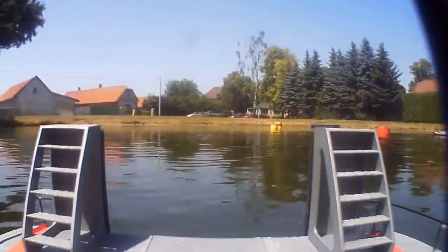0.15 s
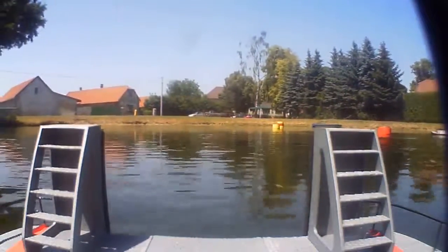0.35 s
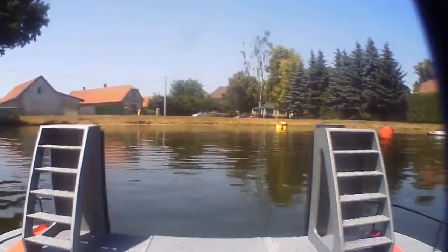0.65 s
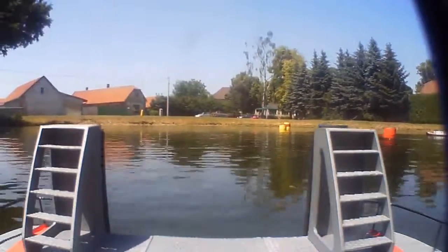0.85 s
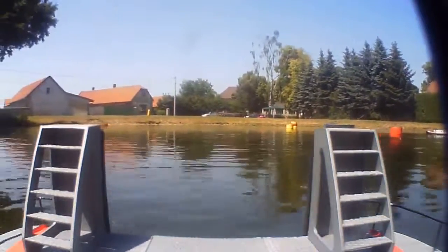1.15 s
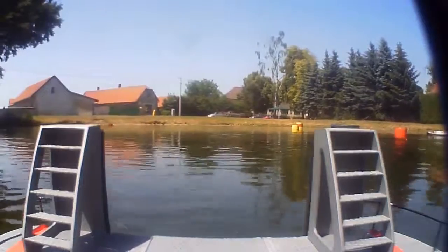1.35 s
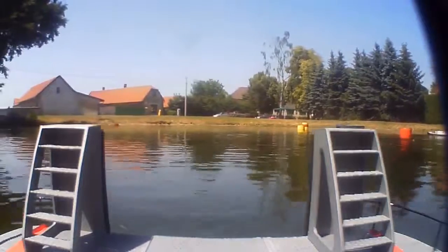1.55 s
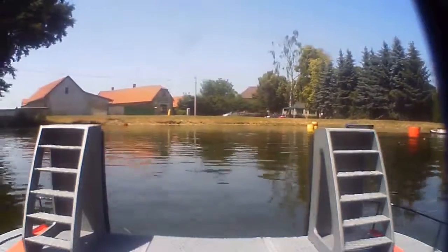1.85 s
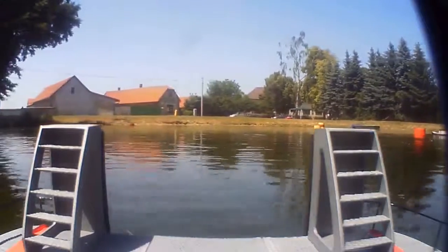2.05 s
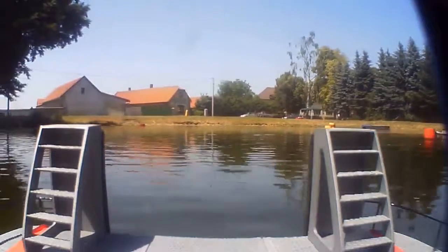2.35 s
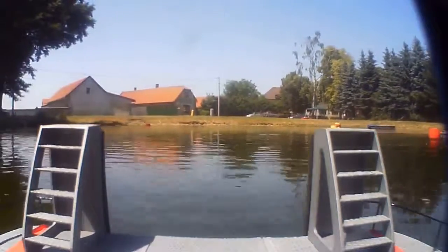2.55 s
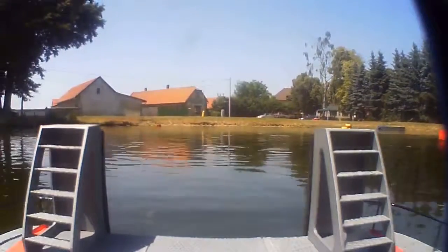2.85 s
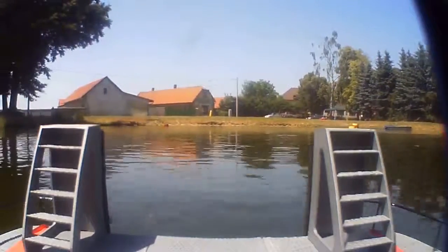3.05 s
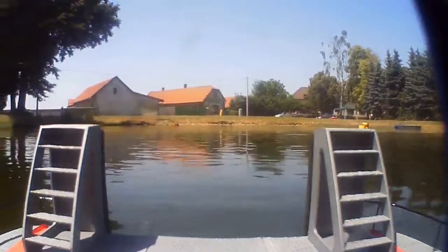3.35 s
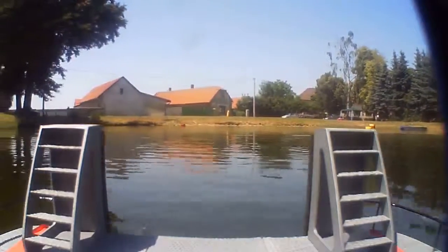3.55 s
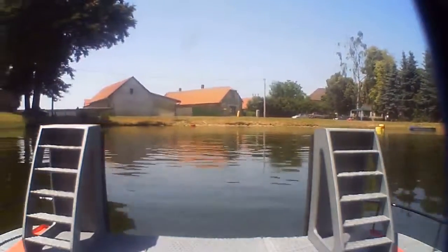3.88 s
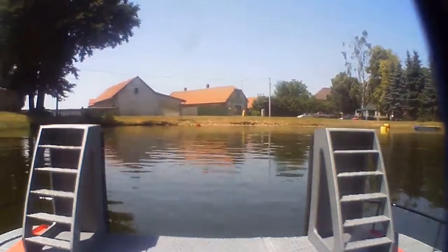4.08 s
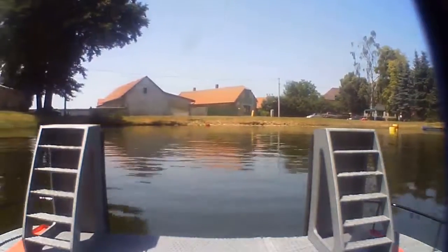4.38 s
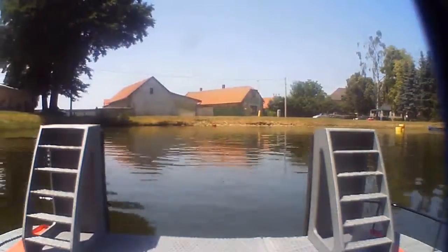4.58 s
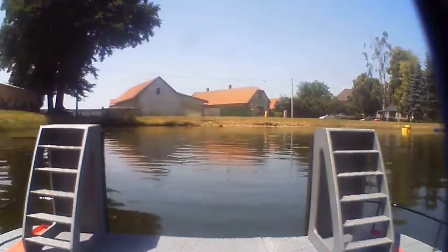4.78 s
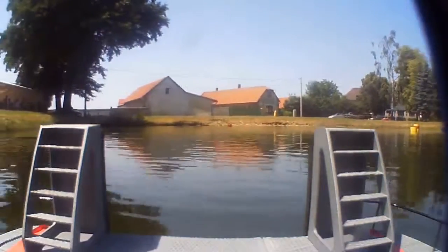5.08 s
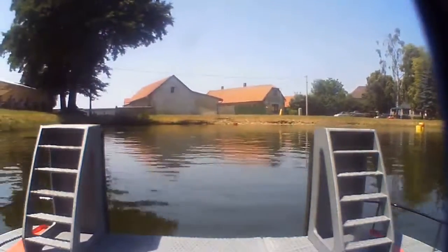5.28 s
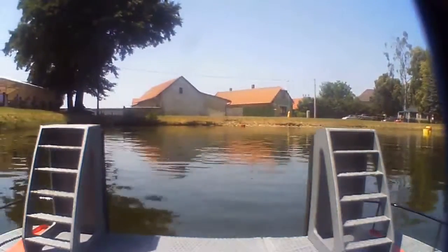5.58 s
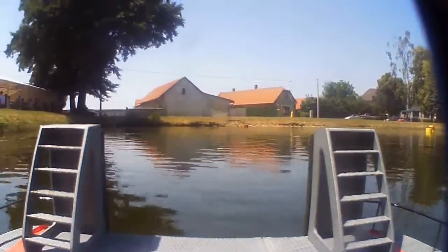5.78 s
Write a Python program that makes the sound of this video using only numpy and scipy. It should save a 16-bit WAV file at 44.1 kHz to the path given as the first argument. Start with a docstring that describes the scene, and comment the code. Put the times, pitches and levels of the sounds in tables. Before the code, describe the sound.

Close, gritty buzz of a little electric boat motor with knocking shaft, climbing gradually in pitch before a quick reversal and duller rev-up.

```python
"""A model boat's small geared electric motor, heard through the hull by a microphone on deck.
It first slows astern, is thrown ahead under load at 0.4 s and gains speed to 4.8 s: random tooth taps rattle
hull and case, the rotor hums, the mesh whines, brushes tick, the shaft knocks in its play, a controller whistles.
Near 5.15 s it reverses and speeds up astern: gear case and shell grow duller, a wavering tone replaces the
whistle, the shaft thumps and, from 5.37 s, ticks once a turn. Faint hiss lies under everything."""
import sys
import numpy as np
from scipy import signal
from scipy.fft import rfft, irfft
from scipy.io import wavfile
from scipy.ndimage import uniform_filter1d

SR = 44100
rng = np.random.default_rng(int(sys.argv[2]) if len(sys.argv) > 2 else 0)


def dump(signal):
    """Clip the signal to [-1, 1] and save it as 16-bit WAV at the path in sys.argv[1]."""
    limited = np.clip(np.atleast_2d(signal).T, -1, 1)
    pcm = np.round(limited * 32767).astype(np.int16)
    wavfile.write(sys.argv[1], SR, pcm)


N = 261015
PINION_TEETH, WHEEL_TEETH = 16, 50


def undb(db):
    """Amplitude factor of a level in dB."""
    return 10 ** (np.asarray(db) / 20)


def unit(x):
    """Scale to an RMS of 1."""
    return x / np.sqrt(np.mean(x ** 2))


def walk(rate_hz):
    """Random levels held 1 / rate_hz and smoothed twice; RMS 1."""
    hold = max(int(SR / rate_hz), 2)
    steps = np.repeat(rng.standard_normal(N // hold + 1), hold)[:N]
    return unit(uniform_filter1d(uniform_filter1d(steps, hold), hold))


def ring(x, modes):
    """Minimum-phase, unit-energy response of a body whose steep resonances add in power."""
    size = 2 ** 14
    f = np.fft.rfftfreq(size, 1 / SR)
    power = sum(undb(2 * db) / (1 + (2 * (f - hz) / width_hz) ** 2) ** 2 for hz, width_hz, db in modes)
    # fold the cepstrum to make the response causal
    cepstrum = irfft(np.log(power) / 2)
    cepstrum[1:size // 2] *= 2
    cepstrum[size // 2 + 1:] = 0
    response = irfft(np.exp(rfft(cepstrum)))[:size // 2]
    return signal.fftconvolve(x, unit(response) / np.sqrt(size // 2))[:N]


def shaft_turns(turns):
    """Turns of the propeller shaft, geared down from the motor."""
    return turns * PINION_TEETH / WHEEL_TEETH


def taps(turns):
    """One unit tap at every whole turn, either way round."""
    return np.abs(np.diff(np.floor(turns), prepend=np.floor(turns[0])))


def once_a_turn(turns, depth_db):
    """Eccentric wheels press the teeth harder once a turn."""
    return undb(depth_db * np.cos(2 * np.pi * turns))


def curves(table, t):
    """Columns of a table joined by straight lines in time."""
    s, *columns = np.transpose(table)
    return [np.interp(t, s, column) for column in columns]


def tone(table, hz, waver_rad, t):
    """Thin sine with wavering phase, sounding only over the span of its table."""
    s, db = np.transpose(table)
    level = undb(np.interp(t, s, db, left=-200, right=-200))
    return level * np.sin(2 * np.pi * hz * t + waver_rad * walk(37))


# Speed controller whistle. Each row: time in seconds, peak level in dB.
WHISTLE = [(.37, -59.5), (1.0, -59), (5.0, -60.5)]
# Wavering tone astern. Each row: time in seconds, peak level in dB.
DRONE = [(5.13, -62.5), (5.5, -59.5), (5.92, -61.5)]
WHISTLE_HZ, DRONE_HZ = 2093, 1360


def controller(t):
    """The controller whistles as it chops the current; another tone sounds astern."""
    return tone(WHISTLE, WHISTLE_HZ, 0.47, t) + tone(DRONE, DRONE_HZ, 0.31, t)


# Resonances rung by a dry tick. Each row: frequency in Hz, width in Hz, relative level in dB.
TICK = [(2457, 250, 16.5), (3100, 790, 4), (6140, 1170, -5.5), (8700, 710, 0.5), (9470, 300, 2.5),
        (10300, 610, -1.5)]
BRUSH_AHEAD_DB, BRUSH_ASTERN_DB = -51, -50  # before load, fading and ring gain
BRUSH_LOAD_SHARE = .4  # dB of tick per dB of case rattle
BRUSH_FADE_FROM_HZ, BRUSH_FADE_DB_PER_HZ = 118, -.4  # Hz of motor turns


def brushes(turns, speed_hz, case_db):
    """Brushes tick once per motor turn, following the case load and fading at high speed."""
    tick_db = np.where(speed_hz > 0, BRUSH_AHEAD_DB, BRUSH_ASTERN_DB)
    tick_db = tick_db + BRUSH_LOAD_SHARE * (case_db - case_db.max())
    tick_db = tick_db + BRUSH_FADE_DB_PER_HZ * np.maximum(np.abs(speed_hz) - BRUSH_FADE_FROM_HZ, 0)
    size = undb(tick_db + 2.0 * rng.standard_normal(N))
    return ring(undb(15.5) * taps(turns + 0.33) * size, TICK)


ASTERN_KNOCK_FROM_S, ASTERN_KNOCK_DB, ASTERN_SLIP_S = 5.37, -34, .0015


def astern_knocks(turns):
    """Driven fast astern, the shaft knocks dryly once in each of its turns, a little uneven."""
    s = np.flatnonzero(taps(shaft_turns(turns) + 0.38)) / SR
    s = s[s > ASTERN_KNOCK_FROM_S]
    slip, size = rng.standard_normal((64, 2))[:len(s)].T
    at = np.minimum((s + ASTERN_SLIP_S * slip) * SR, N - 1).astype(int)
    ticks = np.zeros(N)
    ticks[at] = undb(1.5 * size)
    return ring(undb(ASTERN_KNOCK_DB) * ticks, TICK)


def propeller(turns, hull_db):
    """The shaft thumps at its own slower turn when it runs fast astern."""
    fast = np.clip((-np.gradient(turns) * SR - 80) / 70, 0, 1)
    angle = 2 * np.pi * shaft_turns(turns)
    thump = undb(-9.5) * np.sin(angle) + undb(-18.0) * np.sin(2 * angle)
    return fast * undb(hull_db + 3.3 * walk(15)) * thump


# Hull resonances. Each row: frequency in Hz, width in Hz, relative level in dB.
HULL = [(49.7, 47, -29), (147.6, 57.6, -4), (190.1, 12.1, 7), (231.4, 53.3, -2.5), (309.6, 42, -8.5),
        (407.2, 58, -5), (456.7, 59, -7), (502.8, 54, -4), (544.2, 53, -3.5), (604.7, 165, -6),
        (732, 69, -14), (916, 196, -21), (1081, 92, -20.5), (1278, 130, -28.5)]
# Rotor overtones ahead. Each row: multiple of the motor turn, relative level in dB.
AHEAD = [(2, -3), (3, -4.5), (4, -11), (5, -18), (6, -7)]
# Rotor overtones astern. Each row: multiple of the motor turn, relative level in dB.
ASTERN = [(2, -6), (3, -9.5), (4, -9), (5, -10.5), (6, -9)]
HUM_DB, HUM_DB_PER_OCTAVE = -44, 8.5  # at 100 turns a second, before the mount swell
MOUNT_HZ, MOUNT_WIDTH_HZ, MOUNT_DB = 123.3, 30, 10.5
OVERTONES_AHEAD_DB, OVERTONES_ASTERN_DB = -45.5, -46  # offsets at 100 turns a second
OVERTONES_DB_PER_OCTAVE = 2.5


def overtones(table, turns, flutter_db, waver_rad):
    """Sum of fluttering multiples of the motor turn."""
    total = 0
    for multiple, db in table:
        level = undb(db + walk(5.19) + flutter_db * walk(30))
        total = total + level * np.sin(multiple * 2 * np.pi * turns + waver_rad * walk(25))
    return total


def rotor(turns, speed_hz):
    """Unbalance hums, swelling at the mount resonance; hull-coloured overtones flutter most under load ahead."""
    hz = np.abs(speed_hz)
    octaves = np.log2(np.maximum(hz, 10) / 100)
    mount_db = MOUNT_DB / (1 + (2 * (hz - MOUNT_HZ) / MOUNT_WIDTH_HZ) ** 2)
    hum_db = HUM_DB + HUM_DB_PER_OCTAVE * octaves + mount_db
    hum = np.sqrt(2) * np.sin(2 * np.pi * turns) * undb(hum_db + 0.7 * walk(47))
    over_db = np.where(speed_hz > 0, OVERTONES_AHEAD_DB, OVERTONES_ASTERN_DB)
    over_db = over_db + OVERTONES_DB_PER_OCTAVE * octaves
    ahead = overtones(AHEAD, turns, 4.0, .53)
    astern = overtones(ASTERN, turns, 1.5, .25)
    over = np.where(np.gradient(turns) < 0, astern, ahead)
    broad_modes = [mode for mode in HULL if mode[1] > 25]
    return hum + ring(over * undb(over_db), broad_modes)


LIGHT_KNOCK_DB, LIGHT_SCATTER_DB, LIGHT_DULL_DB = -7.5, 3.5, 1.5  # first one relative to case_db


def light_knocks(turns, speed_hz, case_db):
    """Rows for knocks(): ahead, each shaft turn gives a light one of random size."""
    i = np.flatnonzero(taps(shaft_turns(turns)) * (speed_hz > 0))
    size = (2 * rng.random((256, 2)) - 1)[:len(i)].T
    db = case_db[i] + LIGHT_KNOCK_DB + LIGHT_SCATTER_DB * size[0]
    dull_db = LIGHT_DULL_DB + LIGHT_SCATTER_DB * size[1]
    return list(zip(i / SR, db, dull_db))


# Gear case resonances. Each row: frequency in Hz, width in Hz, relative level in dB.
CASE = [(1380, 57, -11.5), (1586, 750, -0.5), (2212, 270, 4.5), (2451, 626, 1.5), (3144, 160, -5.5),
        (3710, 230, -17.5)]
# Motor shell resonances. Each row: frequency in Hz, width in Hz, relative level in dB.
SHELL = [(5530, 500, -12), (7040, 1300, -7.5), (8680, 1000, 0.5), (9480, 1340, -1), (11500, 1700, -10),
         (14000, 1200, -10)]
# Thin gear case rings, lit by knocks and mesh whine. Each row: frequency in Hz, width in Hz, relative level in dB.
RINGS = [(944, 45, 20), (1180, 29, 9), (1283, 73, 6.5), (1665, 700, -3), (2270, 110, 15), (2440, 110, 12),
         (2470, 37, -12), (2560, 250, 9.5), (3100, 56, -11), (3583, 110, -6), (4900, 84, -17),
         (5170, 90, -13), (5390, 110, -13), (6720, 360, -15.5), (8660, 150, -1), (9790, 68, 7)]
# Loudest shaft knocks. Each row: start in seconds, relative level in dB, extra level of the dull blow in dB.
KNOCKS = [(0.0702, -55, 8.5), (0.262, -55.5, -4), (0.2887, -60, 1), (0.3553, -55.5, 8), (0.4114, -74, 9),
          (0.4639, -55.5, 8), (0.7774, -51.5, 11), (0.8065, -49, 3), (0.842, -51.5, 15), (0.8716, -47, 8),
          (0.907, -52, 11), (1.035, -54, 8), (1.2803, -57, 16), (1.3054, -59, -3), (1.3697, -45.5, 8.5),
          (1.4017, -50, 10.5), (1.4334, -52, 10), (1.691, -55, 14.5), (2.3556, -47, 12), (2.385, -49, 9),
          (2.494, -52, 1), (2.81, -47, 9), (2.839, -50, 9), (2.8682, -45, 6.5), (2.8956, -48, 5),
          (3.2472, -57, 5), (3.2755, -47, 6), (3.6995, -53, -3), (3.8116, -50, -8), (4.1818, -52, -5)]


def knocks(rows):
    """The shaft strikes in its play: tick, dull blow and brighter scrape ring hull, case and shell."""
    t = np.arange(int(.015 * SR)) / SR
    dull, bright, tick = np.zeros((3, N + len(t)))
    signs = np.sign(rng.standard_normal((len(rows), 1024)))
    for (s, db, dull_db), noise in zip(rows, signs):
        i = int(s * SR)
        burst = noise[:len(t)]
        dull[i:i + len(t)] += undb(db + dull_db) * burst * np.exp(-t / 0.0044)
        bright[i:i + len(t)] += undb(db) * burst * np.exp(-t / 0.0037)
        tick[i] = undb(db)
    scrape = ring(undb(-4) * bright, SHELL)
    dry_tick = ring(undb(19) * tick, TICK)
    case = ring(undb(3) * dull, RINGS[2:4]) + ring(undb(-1.5) * dull, CASE)
    return scrape + dry_tick + case + ring(undb(10.5) * dull, HULL)


# Mesh whine. Each row: multiple of the tooth rate, relative level in dB, rate of the random level in Hz.
MESH = [(1, 5.5, 160), (2, 2.5, 150), (3, 6, 450), (4, 3, 220), (5, 2, 2000), (6, -5.5, 420)]


def mesh(turns, speed_hz, case_db):
    """Blurred whine on multiples of the tooth rate ahead, strongest as the motor pulls up."""
    ahead = speed_hz > 0
    pull = np.clip(uniform_filter1d(np.gradient(speed_hz) * SR, SR // 20) / 150, 0, 1)
    angle = 2 * np.pi * PINION_TEETH * turns
    whine = sum(undb(db) * walk(blur_hz) * np.sin(k * angle) for k, db, blur_hz in MESH)
    whine = whine * ahead * undb(case_db - 13.5 + 4.4 * pull)
    hull_whine = pull * ahead * undb(-42.5) * walk(119.6) * np.sin(angle)
    return ring(whine, RINGS) + ring(hull_whine, HULL)


def gears(turns, hull_db, case_db):
    """Teeth tap with random force and grind; hull, case and shell ring, the last two weaker astern."""
    shaft = shaft_turns(turns)
    astern = np.gradient(turns) < 0
    force = rng.standard_normal(N) * undb(1.4 * rng.standard_exponential(N))
    teeth = force * taps(turns * PINION_TEETH)
    teeth = unit(teeth * once_a_turn(shaft, 1.23) * once_a_turn(turns, 0.34))
    hull = ring(teeth * undb(hull_db - 1.5 + 0.53 * walk(5.1)), HULL)
    grind = rng.standard_normal(N) + 0.28 * teeth
    grind = unit(grind * once_a_turn(shaft, 1.5) * once_a_turn(turns, 0.75))
    grind = grind * undb(case_db + 1.0 * walk(24.99))
    case = ring(grind * undb(1.5 - 9.3 * astern), CASE)
    shell = ring(grind * undb(-13.5 - 11 * astern), SHELL)
    return hull + case + shell


# Course of the motor. Each row: time in seconds, motor turns per second (astern negative),
# relative hull rattle in dB, relative gear case rattle in dB.
MOTOR = [(0, -142, -32.5, -49.5), (.2, -124, -34.5, -63.5), (.28, -100, -36, -75), (.32, -78.5, -40.5, -72),
         (.36, -16, -14.5, -65), (.4, 32.5, -21.5, -67), (.51, 70, -24.5, -58.5), (.6, 81, -24, -54),
         (.77, 86, -21, -53), (1.0, 91.5, -22.5, -54), (2.0, 101.5, -22, -50.5), (3.1, 107, -21.5, -49),
         (3.21, 107.5, -20, -47.5), (3.3, 108, -24, -50), (4.0, 113.5, -24, -51), (4.8, 114.5, -25, -52),
         (5.0, 104, -26.5, -53.5), (5.1, 85, -22, -59.5), (5.13, 39.5, -27, -62), (5.165, -40, -33, -79),
         (5.185, -71.5, -33, -55), (5.24, -81.5, -30, -54.5), (5.4, -123, -32.5, -58.5),
         (5.6, -142, -31.5, -54.5), (5.92, -157, -31.5, -50)]


def scene():
    """Motor speed drives rotor, gears, brushes and regular knocks; controller tones and listed knocks keep own times."""
    t = np.arange(N) / SR
    speed_hz, hull_db, case_db = curves(MOTOR, t)
    turns = np.cumsum(speed_hz) / SR
    motor = controller(t) + brushes(turns, speed_hz, case_db) + rotor(turns, speed_hz)
    all_knocks = list(KNOCKS) + light_knocks(turns, speed_hz, case_db)
    shaft = astern_knocks(turns) + propeller(turns, hull_db) + knocks(all_knocks)
    train = mesh(turns, speed_hz, case_db) + gears(turns, hull_db, case_db)
    return (motor + shaft + train)[None]


HISS_DB, TOP_HZ = -70.5, 15750


def record(dry):
    """Faint microphone hiss, then a steep cut at the top."""
    wet = dry + undb(HISS_DB) * rng.standard_normal(dry.shape)
    top_cut = signal.ellip(12, .2, 90, TOP_HZ, fs=SR, output="sos")
    return signal.sosfilt(top_cut, wet)


dry = scene()
out = record(dry)
dump(out)
```